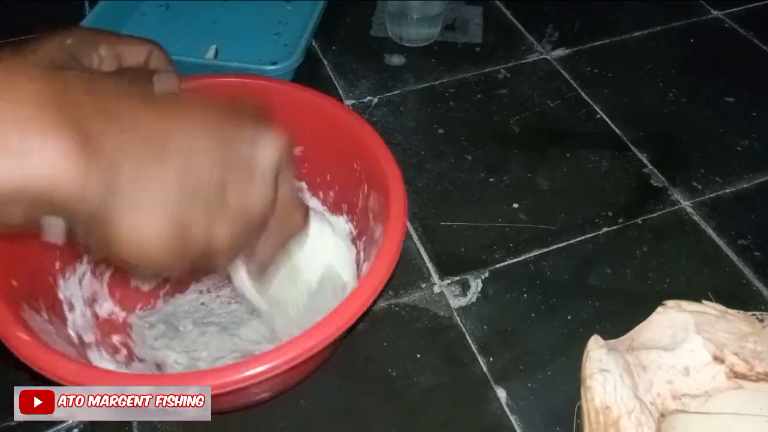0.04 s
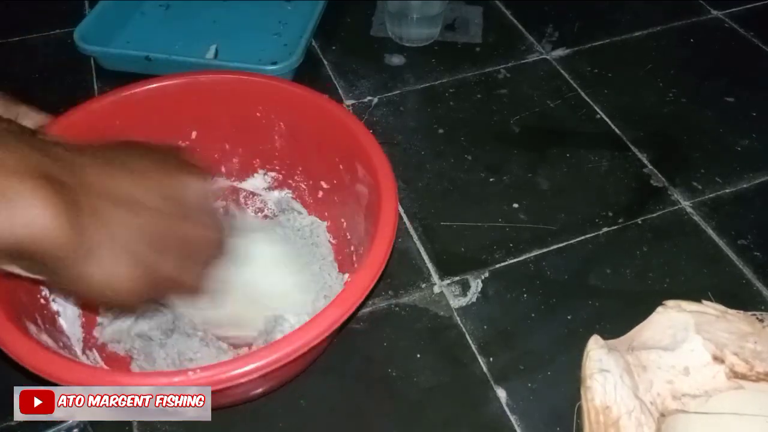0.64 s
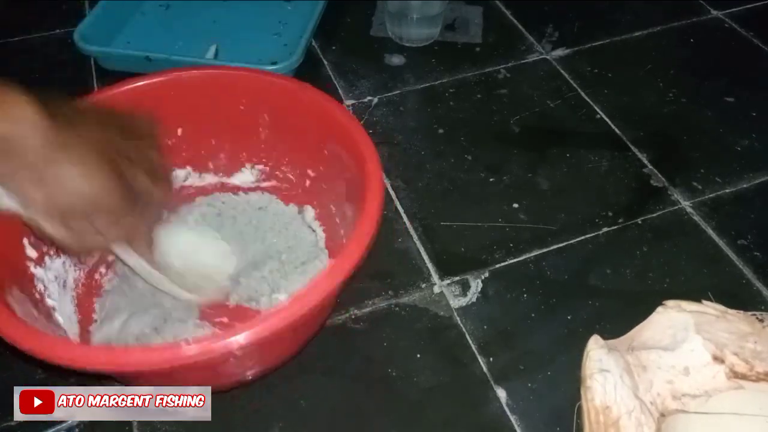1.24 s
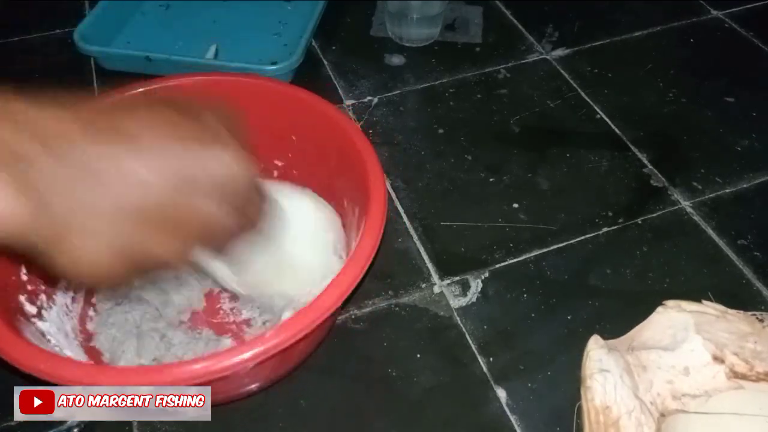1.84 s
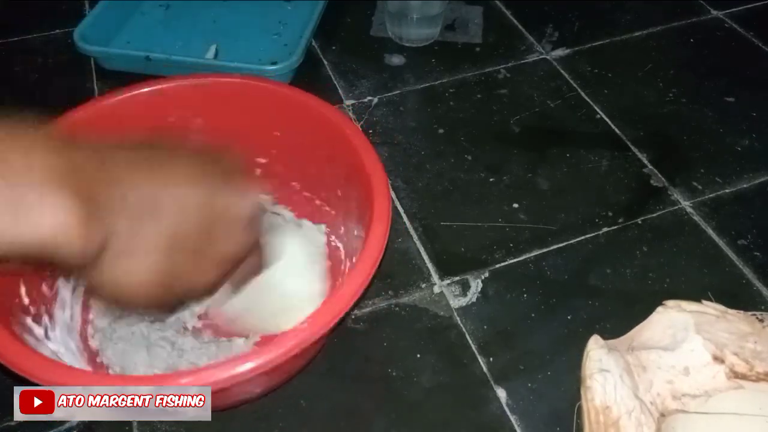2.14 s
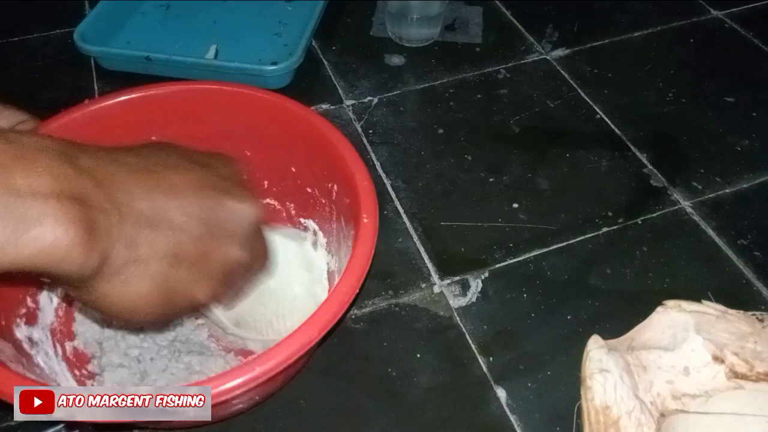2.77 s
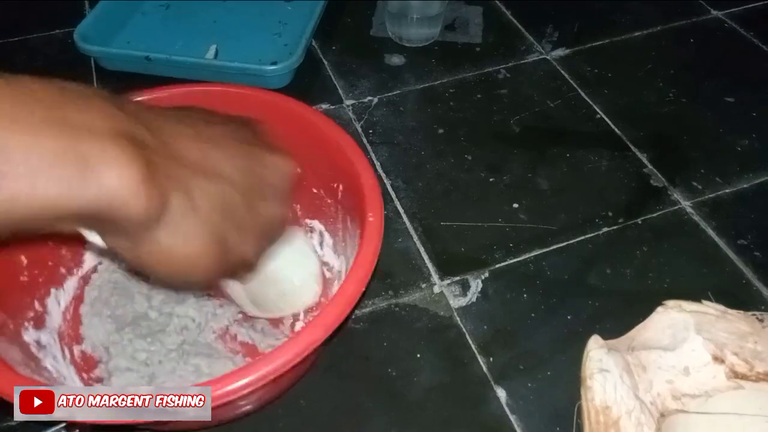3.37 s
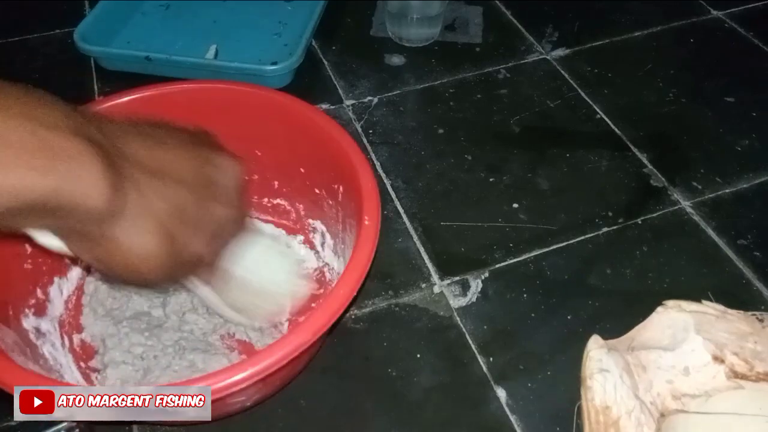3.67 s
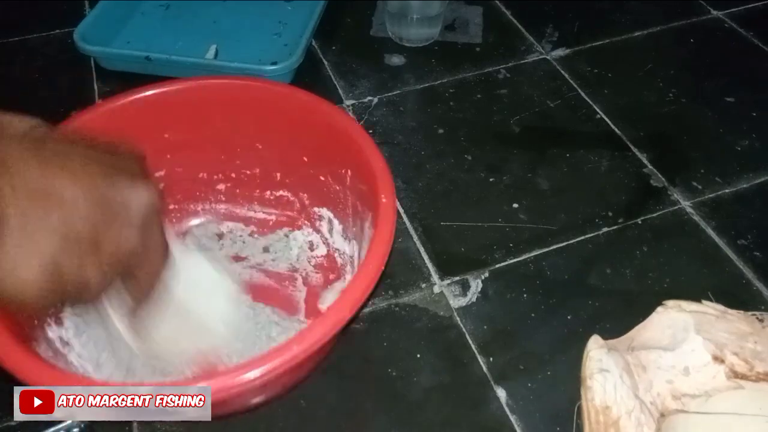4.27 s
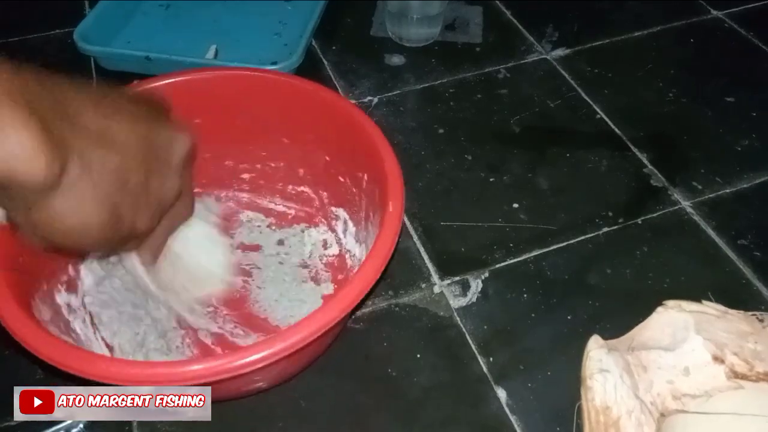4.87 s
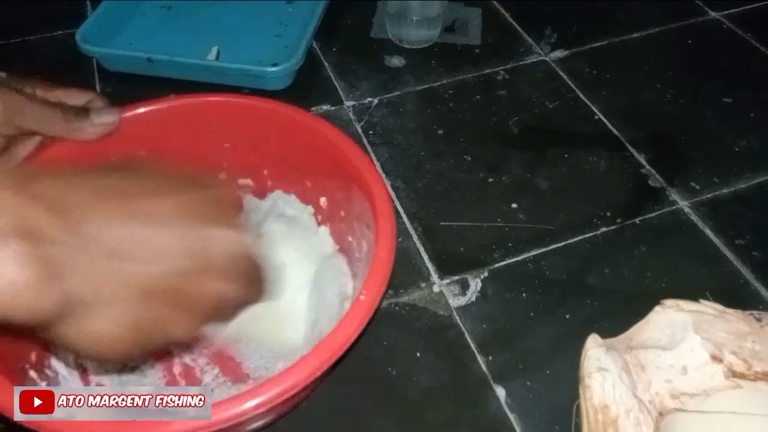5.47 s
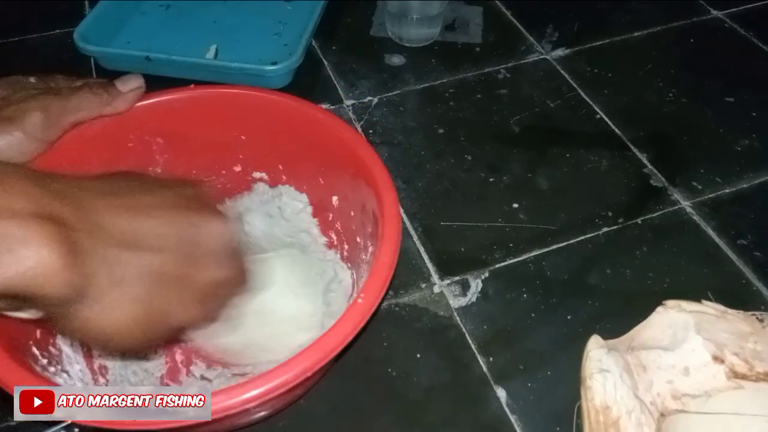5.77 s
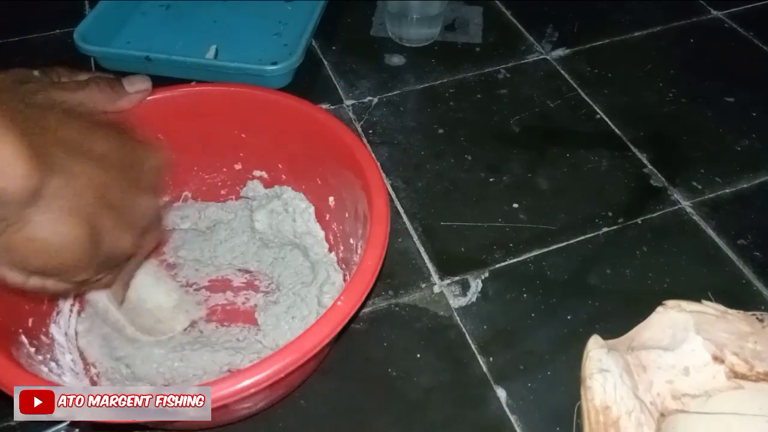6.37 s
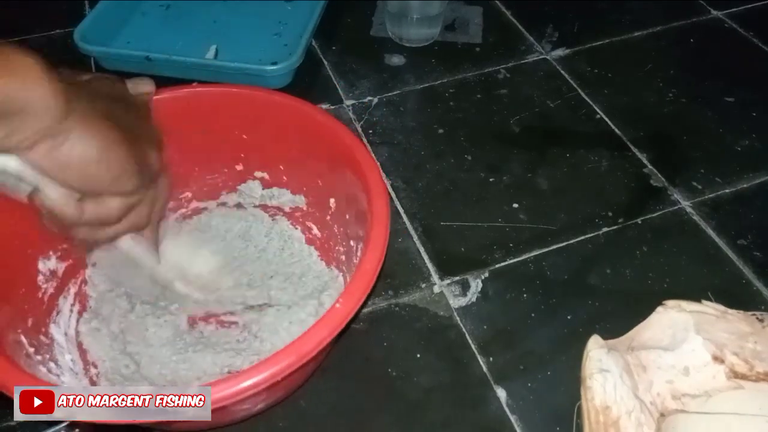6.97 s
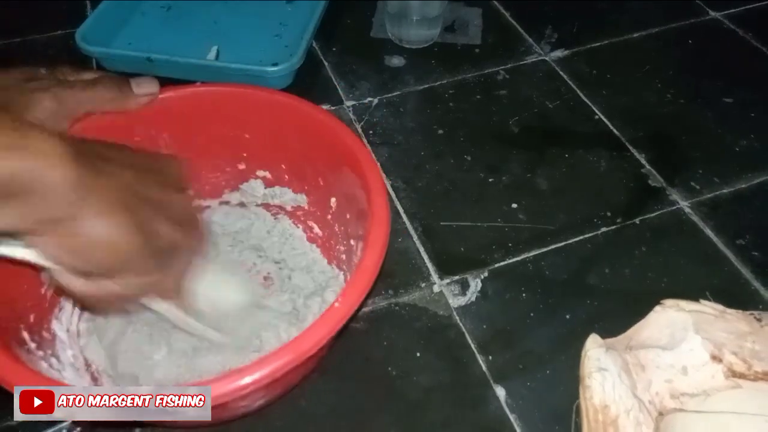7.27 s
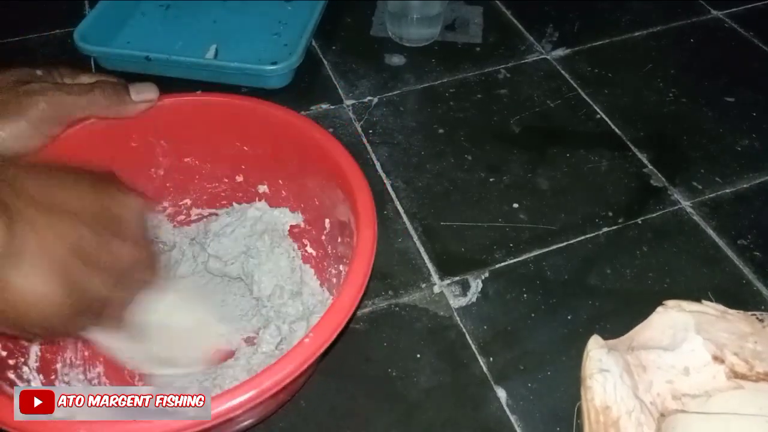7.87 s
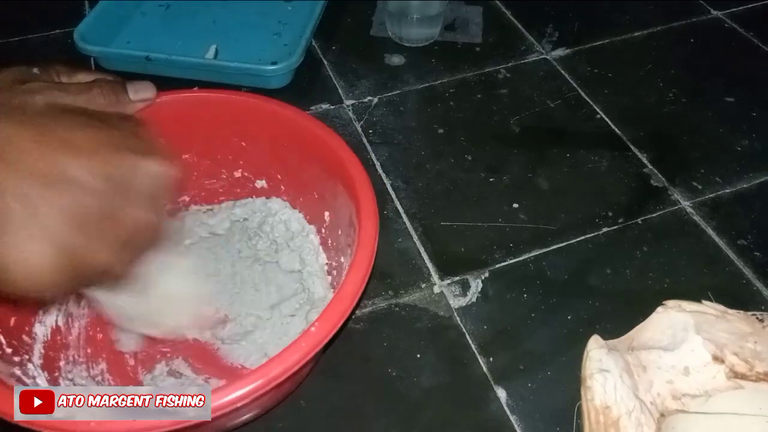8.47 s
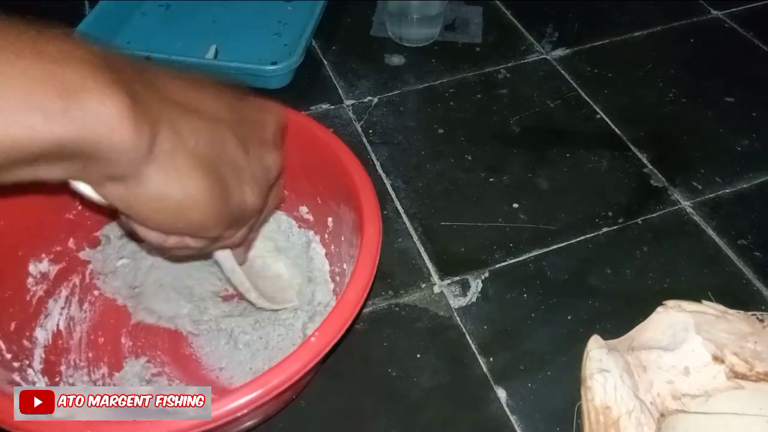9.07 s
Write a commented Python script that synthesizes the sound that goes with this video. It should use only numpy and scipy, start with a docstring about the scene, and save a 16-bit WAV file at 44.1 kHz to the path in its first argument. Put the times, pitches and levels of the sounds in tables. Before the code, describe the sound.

A plastic spoon stirs a damp, crumbly mix in a plastic bowl. Quick, uneven strokes rasp and crackle while the bowl's wall hums hollowly. Dull clacks come throughout as the spoon hits the sides, and heavier pushes make the base thud softly on a tiled floor. The microphone is close, in a small hard room with a short echo and a faint steady rumble.

```python
"""Dull clacks and crunchy scraping: a plastic spoon stirs a damp, crumbly bait mix in a plastic bowl.
The spoon knocks on the bowl, then sticks and slips through the mix, so the crumbs rasp and crackle
and the bowl's wall drones. Knocks and heavy pushes make the base thud on the tiled floor.
A small hard room rings on after each stroke, over a faint steady rumble.
The loudest knocks overload the microphone of a phone close by."""
import sys
import numpy as np
from scipy import signal
from scipy.fft import rfft, irfft
from scipy.io import wavfile

SR = 44100
rng = np.random.default_rng(int(sys.argv[2]) if len(sys.argv) > 2 else 0)


def put_to_file(sound):
    """Save the sound as 16-bit audio at rate SR, in the file named by the first command-line argument."""
    columns = np.atleast_2d(sound).T  # one column per channel
    safe = np.clip(columns, -1, 1)
    whole_steps = np.round(safe * 32767)
    wavfile.write(sys.argv[1], SR, whole_steps.astype(np.int16))


N = 407043

# Pushes through the mix: the spoon's thin edge sounds bright, its back dull. All levels are relative.
# peak_s, swell_s, fade_s, rasp_db, drone_db, crackle_db, brightness_db
SPOON_PUSHES = [(0.009, 0.045, 0.11, -30.0, -34, -44, -7), (0.106, 0.056, 0.092, -24, -25.5, -41, -3),
                (0.273, 0.027, 0.15, -34.5, -35.5, -45.5, 0), (0.383, 0.12, 0.057, -23.5, -29.5, -36, 0),
                (0.626, 0.091, 0.089, -28.5, -29.5, -38.5, -3), (0.913, 0.25, 0.062, -35.5, -38.5, -46, -5),
                (1.131, 0.081, 0.081, -26.5, -36.5, -42, -2), (1.253, 0.12, 0.081, -27, -34.5, -40.5, -2),
                (1.375, 0.15, 0.049, -27, -34.5, -41, 0.5), (1.501, 0.018, 0.097, -28.5, -29, -46.5, -2),
                (1.635, 0.074, 0.06, -25.5, -30, -35, -2), (1.894, 0.069, 0.15, -32.0, -37.5, -45.5, 3.5),
                (2.147, 0.15, 0.055, -27.5, -35, -43, 5.5), (2.218, 0.036, 0.028, -34, -37, -56, -3),
                (2.388, 0.067, 0.04, -26.5, -30, -49, -1), (2.475, 0.04, 0.045, -24.5, -33.5, -46, -2.5),
                (2.679, 0.067, 0.17, -35, -42.5, -49.0, 6), (2.986, 0.13, 0.1, -33, -41, -43, 0),
                (3.09, 0.1, 0.041, -21, -32, -39.5, 7), (3.153, 0.048, 0.14, -40, -40, -51.5, -7),
                (3.405, 0.19, 0.056, -27, -38.5, -40.5, 4.5),
                (3.528, 0.096, 0.05, -21.5, -40.5, -40.5, 7.5), (3.596, 0.077, 0.12, -29.0, -48, -47, 14),
                (3.713, 0.16, 0.047, -32, -44.5, -42, -3), (3.774, 0.032, 0.091, -24.5, -37.0, -36, 13.5),
                (3.865, 0.04, 0.08, -24.5, -40, -39.0, 10), (3.924, 0.021, 0.047, -25, -29, -36, 2),
                (4.012, 0.035, 0.18, -35.5, -48, -48, 6), (4.109, 0.036, 0.183, -32.5, -36, -47.5, -3),
                (4.268, 0.12, 0.12, -29.0, -36.5, -41.5, 5),
                (4.391, 0.018, 0.213, -33.0, -38.5, -58.0, -17),
                (4.5, 0.097, 0.077, -24.5, -27.5, -37.5, 7), (4.611, 0.14, 0.077, -39, -47, -47, 2),
                (4.696, 0.041, 0.057, -40, -53, -50.5, 4), (4.767, 0.047, 0.055, -23, -24, -47, -8),
                (5.021, 0.078, 0.15, -23, -28.5, -37, -2), (5.455, 0.063, 0.19, -32.5, -39.5, -49.5, -3),
                (5.558, 0.15, 0.072, -34, -39, -56, 4), (5.702, 0.061, 0.11, -37, -44.5, -45, -2),
                (5.773, 0.043, 0.057, -20.0, -27.5, -41.5, -2.5),
                (6.003, 0.065, 0.206, -34.5, -40, -47.5, 1), (6.127, 0.018, 0.072, -26, -33, -44, -7),
                (6.256, 0.27, 0.061, -30.5, -38, -42, 0), (6.339, 0.029, 0.051, -37.5, -37, -47.5, -8),
                (6.552, 0.039, 0.099, -32, -42.5, -47, -13), (6.824, 0.14, 0.13, -35.0, -43, -54, -4),
                (6.975, 0.049, 0.45, -37.5, -44.5, -50.5, -9.5), (7.231, 0.14, 0.12, -38, -40, -55, -8),
                (7.335, 0.03, 0.022, -35, -36.5, -58.0, -8), (7.437, 0.025, 0.12, -20.5, -29, -34, -2),
                (7.553, 0.097, 0.06, -32.0, -35.5, -45, -3), (7.711, 0.061, 0.18, -64, -46, -50.5, 4),
                (7.814, 0.074, 0.06, -24, -30.5, -43, -5), (8.079, 0.121, 0.1, -32.5, -39, -43, 2),
                (8.236, 0.064, 0.22, -34.5, -31.5, -44, -11), (8.332, 0.087, 0.079, -23.5, -32, -38, 0),
                (8.609, 0.183, 0.067, -34, -37.5, -48.5, -11), (8.845, 0.13, 0.11, -31.5, -38.5, -46, 1),
                (9.107, 0.088, 0.052, -35.5, -38.0, -48.5, -7), (9.214, 0.089, 0.072, -49.0, -61, -52.5, 7)]
# The spoon hits the bowl: start_s, clack_pitch_hz, base_db, wall_db, rim_db, spoon_db, tick_db
SPOON_KNOCKS = [(0.1312, 2200, -30.5, -27.5, -36, -23.5, -42), (0.3699, 2330, -51, -25, -41, -35, -43),
                (0.5044, 2200, -13.5, -9.5, -16.5, -19, -32.5), (0.5647, 2420, -50, -29, -35, -29, -51),
                (0.6332, 2280, -25.5, -46, -29.5, -31, -50), (0.7839, 2420, -21.5, -17.5, -38, -17, -41),
                (0.7996, 2820, -23, -18, -32, -25, -37), (0.8579, 2330, -35, -24.5, -35, -26, -56),
                (1.0501, 2320, -54, -31.5, -46, -32.5, -60), (1.1891, 2880, -37, -23.5, -32, -27, -34.5),
                (1.4933, 2890, -22, -23, -36, -28.5, -39), (1.5804, 2980, -52, -28, -37, -24.5, -43),
                (1.658, 2240, -32.5, -25.5, -37, -21, -53), (1.7701, 2680, -23, -21.5, -32, -15.5, -30.5),
                (2.032, 2250, -24, -19.5, -24, -25, -46), (2.2667, 2000, -50, -44, -33, -24, -48),
                (2.2952, 2530, -26, -20, -44, -15, -45), (2.3448, 2240, -29, -23.5, -38, -20.5, -38.5),
                (2.3767, 2400, -28, -25, -29, -25.5, -45), (2.4518, 2230, -52, -29.5, -50, -42, -64),
                (2.6128, 3050, -22.5, -18.5, -28.5, -30.5, -43), (2.6345, 2280, -28, -40, -30, -31, -56),
                (2.905, 2030, -21, -27.5, -30, -26.5, -42), (3.2451, 2110, -16.5, -12.5, -11.5, -16.5, -36),
                (3.3275, 2500, -56, -48, -35, -20, -32), (3.5725, 3130, -48, -56, -33, -30, -39),
                (3.8067, 2580, -47, -51, -42, -26, -37), (3.8804, 2570, -61, -54, -43, -33, -51),
                (3.9135, 2220, -38, -32, -24.5, -23, -52), (4.0868, 2460, -24, -24.5, -31, -21.5, -45),
                (4.2153, 2340, -32.5, -27, -27, -23, -42), (4.431, 2260, -29.5, -25.5, -43, -26.5, -60),
                (4.267, 3050, -58, -42, -42, -29.5, -50), (4.4969, 2480, -38, -29.5, -31, -26.5, -44),
                (4.5768, 2330, -27, -17.5, -31, -29, -41), (4.5825, 2230, -36, -18, -22.5, -22.5, -45),
                (4.6524, 2200, -28, -22, -39, -23.5, -46), (4.7856, 2050, -33, -27, -14, -14, -40),
                (4.93, 2340, -24, -22.5, -15, -10, -27), (4.974, 2240, -26.5, -28, -31, -15, -29),
                (5.291, 2450, -45.5, -43, -52, -38.5, -56), (5.9516, 2460, -25, -22, -33, -29.5, -47),
                (6.2578, 2460, -31, -21.5, -32, -28.5, -53), (6.4313, 2780, -26.5, -19.5, -39, -16.5, -33),
                (6.7302, 2230, -23.5, -19, -24, -23.5, -60), (7.292, 2770, -50, -57, -46, -32.5, -41),
                (7.3963, 2080, -23.5, -23.5, -25, -21, -49), (7.5148, 2390, -25, -26, -28.5, -40, -45),
                (7.666, 2500, -37.5, -41, -43, -40.5, -51.5), (8.0015, 2920, -41, -47, -37.5, -33.5, -42.5),
                (8.0907, 3070, -58, -32.5, -34, -24.5, -35), (8.3167, 2080, -27, -30, -19, -24, -52),
                (8.47, 2170, -21, -14, -17.5, -17, -36), (8.7336, 3000, -19, -19, -42, -18, -45),
                (9.0752, 2850, -29.5, -33, -28, -25.5, -37)]
# Tones of a knock, one list each for base, wall, rim, spoon and contact tick: pitch_hz, ring_s, level_db
KNOCK_TONES = [
    [(317, 0.025, -2.5), (384, 0.027, -10), (421.6, 0.019, 0)],
    [(566, 0.0072, -6), (637, 0.027, 7), (736, 0.024, 0.5), (948, 0.0073, -3.5)],
    [(1112, 0.0092, -2), (1366, 0.02, 3), (1567, 0.032, -7)],
    [(1878, 0.027, 5.5), (2075, 0.018, 6.5), (2333, 0.011, 4.5), (2700, 0.017, -2), (3110, 0.018, -7.5),
     (3470, 0.017, -0.5), (4340, 0.016, -14)],
    [(5220, 0.0033, 15.5), (6130, 0.009, 1.5), (8370, 0.016, 0.5), (8600, 0.021, -10), (10400, 0.0048, -12),
     (14600, 0.005, -12)],
]
# A heavy push rocks the bowl against the floor: start_s, level_db, pitch_hz
FLOOR_THUDS = [(0.8, -27.5, 110), (1.049, -33, 113), (1.252, -32, 151), (1.493, -37, 96), (2.345, -29, 94),
               (2.467, -42, 140), (3.53, -42.5, 130), (4.21, -29.5, 86), (4.574, -30, 151),
               (4.928, -30, 139), (5.014, -33, 111), (5.951, -38.5, 121), (8.235, -36, 159),
               (8.732, -36, 104), (9.039, -40, 149)]
# Single hard grains crack under the spoon: start_s, level_db
GRAIN_CRACKS = [(0.0536, -34), (0.6299, -34), (0.9457, -34), (2.9636, -37.5), (4.0127, -32.5),
                (4.4705, -27.5), (5.5208, -30), (6.1527, -20), (6.1658, -35), (8.007, -34), (8.26, -36)]
# Tone colours, or how strong each sound is from low to high: pitch_hz, level_db
RASP_COLOUR = [(700, -25), (1000, -11.5), (1300, -0.5), (1560, -7.5), (2150, 1.5), (2750, -2.5), (3050, -4),
               (3450, -4.5), (4200, -12), (5200, -26.5), (7000, -26), (12000, -52)]  # scraped spoon and bowl
DRONE_COLOUR = [(40, -17.5), (70, -12.5), (130, -11.5), (200, -9.5), (330, -8.5), (470, -7), (540, -1.5),
                (590, -0.5), (645, 3), (700, -1), (780, -2.5), (900, -11.5), (1150, -18.5), (2000, -38)]  # the bowl's wall
CRACKLE_COLOUR = [(2500, -27), (4300, 5.5), (5500, 4), (6900, -5), (8200, 7), (9000, 2.5), (10000, -9),
                  (12200, -15.5), (14000, -8), (15500, -3.5)]  # crushed crumbs
POWDER_COLOUR = [(2000, -21), (3500, 11.5), (4700, 1.5), (6000, -6), (7200, -6.5), (8300, -1), (10000, -23),
                 (14000, -32)]  # loose dry powder
FLECK_COLOUR = [(3000, -22), (6000, -9), (8300, 1), (10000, -3), (12500, -2), (15000, -1)]  # tiny dry grains
CRACK_COLOUR = [(2000, -16), (4000, -6), (6000, -2), (8300, 2), (10000, -8), (12500, -20), (15500, -19)]  # a hard grain
BACKGROUND_COLOUR = [(25, -29), (60, 12), (120, 16.5), (300, 10), (650, -7), (1100, 0.5), (2400, -7),
                     (5500, -57), (8200, -46), (12000, -25), (15500, -10)]  # the steady rumble
# The tiled room's echo (ring_s is the time to fade by 60 dB): pitch_hz, ring_s, level_db
ROOM_ECHO = [(110, 0.34, -10), (300, 0.54, -11), (660, 0.48, -6.5), (1250, 0.32, -8.5), (2520, 0.54, -10),
             (5000, 0.39, -14), (10000, 0.41, -11)]
# A light tap against the rasp's level: base_db, wall_db, rim_db, spoon_db, tick_db
TAP_LEVELS_DB = [-17, -15, -6, -0.5, -12.5]

PUSH_DEPTH_DB, PUSH_ROUNDNESS = 20, 1.046  # rise over a swell and drop over a fade; shape of the top
REST_DB = -66  # the spoon never quite stops rubbing
SKID_SWELL_S, SKID_FADE_S = .014, 0.079  # after a knock the spoon skids on and slows
SKID_RASP_DB, SKID_DRONE_DB = -13, -14  # against the knock's spoon_db and wall_db
SKID_CRACKLE_DB, SKID_BRIGHTNESS_DB = -61, -0.5  # a skid breaks few crumbs
TAPS_PER_S, TAP_HZ = 5.5, 2620
FIRM_KNOCK_DB, JOLT_DB, JOLT_HZ = -22.5, -35.5, 121  # a firm knock's base_db; its thud's level and pitch
JOLT_GROWTH = 0.65  # dB of extra thud for each extra dB in the base
FLECKS_PER_S, FLECK_DB, FLECK_SPREAD_DB = 40, -20, 19
BACKGROUND_DB, TREBLE_LIMIT_HZ = -51, 15700


def scraping():
    """The spoon sticks and slips over crumbs; harder strokes crush more of them each second."""
    rasp_db, drone_db, crackle_db, brightness_db = pushing()
    effort = undb(.5 * (rasp_db - np.max(rasp_db)))
    grip = unit(undb(2.0 * wander(90)))
    slips = clicks(per_s=400 + 5500 * effort, spread_db=3.6, cap_db=19) * grip
    breaks = clicks(per_s=900 + 6000 * effort, spread_db=5.0, cap_db=14) * grip
    rasp = moving_contact(colour(slips, RASP_COLOUR), brightness_db, depth_db=3, per_s=35)
    # the damp paste drags on the wall with slower slips of its own
    drag = clicks(per_s=300 + 1200 * effort, spread_db=1.5, cap_db=10) * grip
    drone = unit(colour((drag + 0.52 * slips) * undb(2 * wander(35)), DRONE_COLOUR))
    crackle = unit(colour(breaks + 0.51 * slips, CRACKLE_COLOUR)) * undb(3.1 * wander(40))
    # a firm push with the edge grinds the powder into a fine hiss
    powder = effort * grip * unit(colour(rng.standard_normal(N), POWDER_COLOUR))
    pops = crumb_pops(crackle_db, per_s=130, level_db=-21, spread_db=12)
    return (rasp * undb(rasp_db + 0.8) + drone * undb(drone_db + 0.75)
            + crackle * undb(crackle_db + 1.4) + powder * undb(crackle_db + 0.42 * brightness_db - 1.0)
            + pops + dry_flecks(crackle_db))


def pushing():
    """Pushes and skids swell and fade. Gives rasp, drone, crackle and brightness over time, in dB."""
    skids = [(s + SKID_SWELL_S, SKID_SWELL_S / 2, SKID_FADE_S,
              spoon_db + SKID_RASP_DB, wall_db + SKID_DRONE_DB, SKID_CRACKLE_DB, SKID_BRIGHTNESS_DB)
             for s, _, _, wall_db, _, spoon_db, _ in SPOON_KNOCKS]
    t = np.arange(0, N, 32) / SR
    peak_s, swell_s, fade_s, *levels, brightness_db = np.transpose(SPOON_PUSHES + skids)[:, :, None]
    from_peak = np.abs(np.where(t < peak_s, (peak_s - t) / swell_s, (t - peak_s) / fade_s))
    force_db = -PUSH_DEPTH_DB * from_peak ** PUSH_ROUNDNESS
    powers = [undb(db + force_db) ** 2 for db in levels]
    totals = np.sum(powers, axis=1) + undb(REST_DB) ** 2
    brightness = np.sum(powers[0] * brightness_db, axis=0) / totals[0]  # the loudest rasp counts most
    return [np.interp(np.arange(N) / SR, t, curve) for curve in (*10 * np.log10(totals), brightness)]


def moving_contact(x, brightness_db, depth_db, per_s, bands=9):
    """As the spoon slides, different pitches stand out; its angle makes them brighter or duller."""
    octave = np.log2(np.fft.rfftfreq(N, 1 / SR) + 1)
    centres = np.linspace(np.log2(1000), np.log2(5000), bands)
    spectrum, out, power = rfft(x), 0, 0
    for weights, lean in zip(np.eye(bands), np.linspace(-.65, .65, bands)):
        band = irfft(spectrum * np.interp(octave, centres, weights), N)
        tilt = undb(lean * brightness_db)
        out = out + band * tilt * undb(depth_db * wander(per_s))
        power = power + np.mean(band ** 2) * tilt ** 2
    return unit(out / np.sqrt(power))


def knocks():
    """Each knock rings the plastic briefly; the hand and the mix shift its pitch from hit to hit."""
    out, t = np.zeros(N), np.arange(SR // 10) / SR
    for start_s, clack_hz, *levels in SPOON_KNOCKS + light_taps():
        for tones, db in zip(KNOCK_TONES, levels):
            hz, ring_s, tone_db = np.transpose(tones)[:, :, None]
            detune, strength = rng.standard_normal((2, len(tones), 1))
            # the part of the spoon that hits decides which tones ring most
            boost_db = 12 * np.exp(-(np.log2(hz / clack_hz) / 0.31) ** 2)
            swing = np.sin(2 * np.pi * hz * (1 + .03 * detune) * t) * die_away(t, ring_s)
            swing *= 1 - np.exp(-(t * hz / .5) ** 2)  # each tone builds up over half a cycle
            ring = np.sum(undb(tone_db + boost_db + 2.2 * strength) * swing, axis=0)
            # a thin shell sends out the change in its motion, so it gives little deep bass
            add(out, start_s, burst(np.diff(ring, prepend=0), db + .5, 1 / 100))
    return out


def light_taps():
    """The spoon trips over lumps at random and taps the bowl, harder during a strong push."""
    rasp_db = pushing()[0]
    draws = rng.random((int(TAPS_PER_S * N / SR), 2))
    return [(when * N / SR, TAP_HZ * 2 ** (pitch / 2 - .25), *(rasp_db[int(when * N)] + TAP_LEVELS_DB))
            for when, pitch in draws]


def thuds():
    """Heavy pushes and knocks jolt the bowl on the floor, and its base swings briefly."""
    out, t = np.zeros(N), np.arange(SR // 5) / SR
    jolts = [(s, JOLT_DB + JOLT_GROWTH * (base_db - FIRM_KNOCK_DB),
              JOLT_HZ * np.exp(0.18 * rng.standard_normal())) for s, _, base_db, *_ in SPOON_KNOCKS]
    for start_s, db, hz in FLOOR_THUDS + jolts:
        low = np.sin(2 * np.pi * hz * t) * np.exp(-t / 0.0077)
        high = 0.38 * np.sin(2 * np.pi * 1.52 * hz * t) * np.exp(-t / 0.0071)
        swing = (low + high) * (1 - np.exp(-t / 0.0033))
        add(out, start_s, burst(np.diff(swing, prepend=0), db + 0.76, 3 / 100))
    return out


def cracks():
    """A hard grain bursts in a millisecond or two, with a bright snap."""
    out, t = np.zeros(N), np.arange(SR // 40) / SR
    for start_s, db in GRAIN_CRACKS:
        snap = colour(rng.standard_normal(len(t)) * np.exp(-t / 0.00035), CRACK_COLOUR)
        add(out, start_s, burst(snap, db, 1 / 200))
    return out


def crumb_pops(crackle_db, per_s, level_db, spread_db):
    """Moist crumbs come apart with tiny separate snaps, each at its own pitch."""
    out, t = np.zeros(N), np.arange(SR // 200) / SR
    gaps, strengths, lownesses = rng.random((2500, 3)).T
    times = np.cumsum(-np.log(1 - gaps)) / per_s
    for start_s, strength, lowness in zip(times[times < N / SR], strengths, lownesses):
        hz = 11000 * (2600 / 11000) ** lowness
        tear = rng.standard_normal(len(t)) * np.exp(-t / .0008)  # a quick run of smaller breaks
        snap = np.convolve(tear, np.sin(2 * np.pi * hz * t) * np.exp(-t * hz))
        # even a light touch breaks some crumbs, so they swell less than the stroke
        db = level_db + .75 * crackle_db[int(start_s * SR)] + spread_db * strength ** 3
        add(out, start_s, burst(snap, db, 1 / 200))
    return out


def dry_flecks(crackle_db):
    """The smallest dry grains break with thin, very bright ticks: many faint, a few clear."""
    happens = rng.random(N) < FLECKS_PER_S / SR
    sizes = happens * undb(FLECK_DB + 0.76 * crackle_db + FLECK_SPREAD_DB * rng.random(N) ** 3)
    t = np.arange(SR // 200) / SR
    snap = colour(rng.standard_normal(len(t)) * np.exp(-t / .0002), FLECK_COLOUR)
    return signal.fftconvolve(sizes, burst(snap, 0, 1 / 200))[:N]


def bowl_hum(x, hz, ring_s, gain, drift):
    """The air in the bowl hums on; the moving hand partly covers the opening and bends the pitch."""
    fade = die_away(np.arange(SR // 2) / SR, ring_s)
    tone = np.exp(2j * np.pi * np.cumsum(hz * (1 + drift * wander(5.7))) / SR)
    return gain * 2 * np.real(tone * signal.fftconvolve(x / tone, fade / np.sum(fade))[:N])


def room(x):
    """The arm and the bowl move about, so the pattern of echoes keeps changing."""
    blend = 2 * wander(2)
    return echoes(x * np.cos(blend)) + echoes(x * np.sin(blend))


def echoes(x):
    """Sound bounces off tiles and walls and blurs into a short fading tail."""
    t = np.arange(SR) / SR
    pitch = np.log(np.fft.rfftfreq(SR, 1 / SR) + 1)
    centres = np.log(np.transpose(ROOM_ECHO)[0])
    noise, tail = rfft(rng.standard_normal(SR)), 0
    for (_, ring_s, db), weights in zip(ROOM_ECHO, np.eye(len(ROOM_ECHO))):
        band = irfft(noise * np.interp(pitch, centres, weights), SR)
        fade = die_away(t, ring_s) * (1 - np.exp(-(t / 0.0013) ** 2))
        tail = tail + band * undb(db) * fade / np.sqrt(np.sum(fade ** 2))
    return signal.fftconvolve(x, tail)[:N]


def background():
    """A faint, steady rumble of low noise."""
    return undb(BACKGROUND_DB) * unit(colour(rng.standard_normal(N), BACKGROUND_COLOUR))


def clicks(per_s, spread_db, cap_db):
    """Tiny breaks at random moments: many weak, a few strong."""
    happens = rng.random(N) < per_s / SR
    sizes = undb(np.minimum(spread_db * rng.exponential(size=N), cap_db))
    return unit(happens * sizes * rng.choice([-1, 1], N) / np.sqrt(per_s))


def wander(per_s):
    """A curve that drifts to a new random value per_s times a second; its typical size is 1."""
    targets = rng.standard_normal(4096)
    return unit(np.interp(np.arange(N) / SR * per_s, np.arange(len(targets)), targets))


def colour(x, points, size=4096):
    """Give x a tone colour: a click comes out as a short ring."""
    hz, db = np.transpose(points)
    pitch = np.log(np.fft.rfftfreq(size, 1 / SR) + 1)
    shape = irfft(np.log(undb(np.interp(pitch, np.log(hz), db))))
    # fold the shape so that the ring comes after the click, never before
    shape[1:size // 2] *= 2
    shape[size // 2 + 1:] = 0
    return signal.fftconvolve(x, irfft(np.exp(rfft(shape))))[:len(x)]


def die_away(t, ring_s):
    """A fade that drops 60 dB in ring_s seconds."""
    return np.exp(-np.log(1000) * t / ring_s)


def undb(db):
    """Turn decibels into a number to multiply by."""
    return 10 ** (np.asarray(db) / 20)


def unit(x):
    """Scale x to an average power of 1."""
    return x / np.sqrt(np.mean(x ** 2))


def burst(x, db, seconds):
    """Scale a short sound so that its energy, spread over the given time, has this level."""
    return x * undb(db) * np.sqrt(seconds * SR / np.sum(x ** 2))


def add(out, start_s, x):
    """Mix x into out from start_s on."""
    i = max(int(start_s * SR), 0)
    out[i:i + len(x)] += x[:max(len(out) - i, 0)]


def scene():
    """Spoon, mix and bowl in the room, over a faint background."""
    bowl = scraping() + knocks() + thuds() + cracks()
    bowl = bowl + undb(3 * wander(5)) * bowl_hum(bowl, hz=648, ring_s=.15, gain=.55, drift=.022)
    return (background() + undb(0.44) * (bowl + room(bowl)))[None]


def record(dry):
    """The phone thins the deep bass, flattens the loudest peaks and cuts the highest treble."""
    thin = signal.sosfilt(signal.butter(2, 58, "highpass", fs=SR, output="sos"), dry)
    clipped = thin / (1 + thin ** 6) ** (1 / 6)
    return signal.sosfilt(signal.ellip(10, .2, 70, TREBLE_LIMIT_HZ, fs=SR, output="sos"), clipped)


dry = scene()
out = record(dry)
put_to_file(out)
```